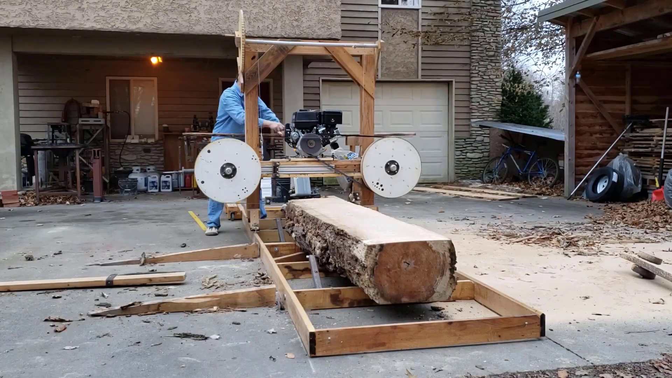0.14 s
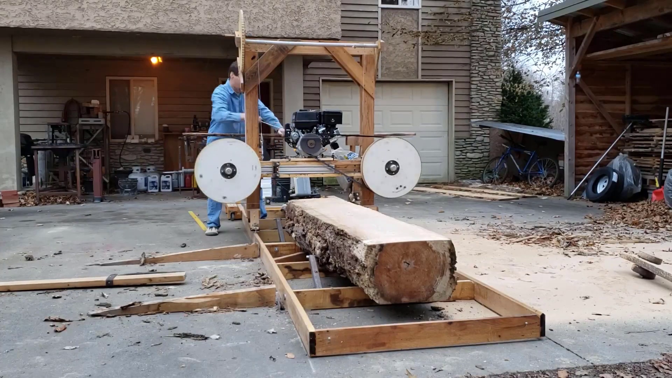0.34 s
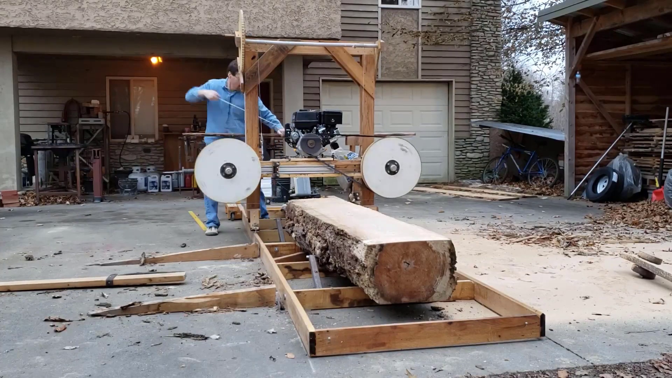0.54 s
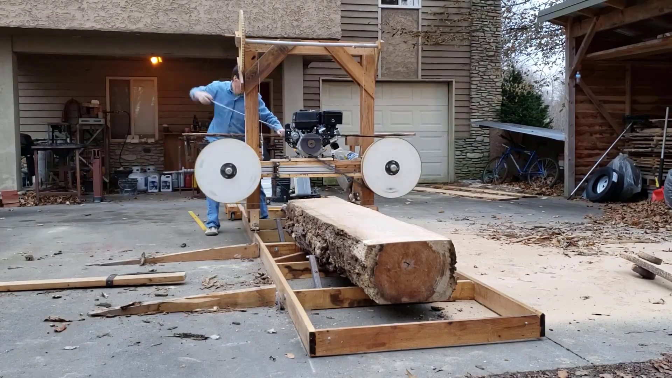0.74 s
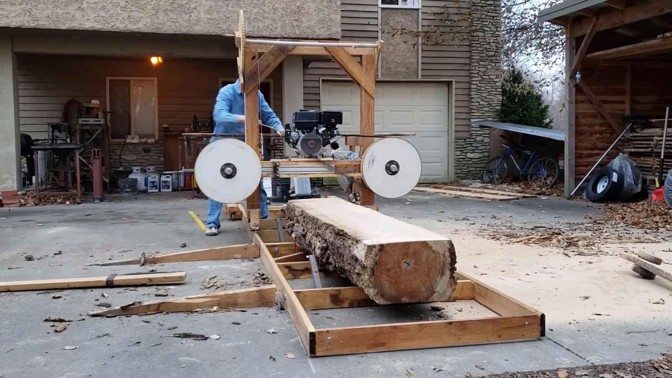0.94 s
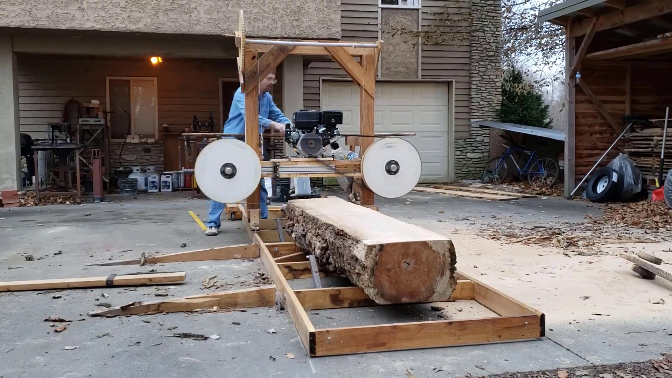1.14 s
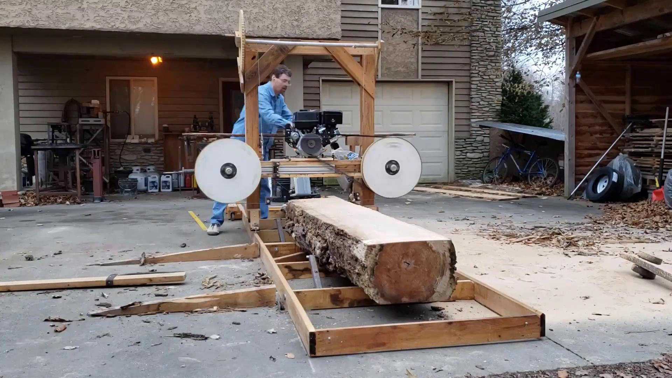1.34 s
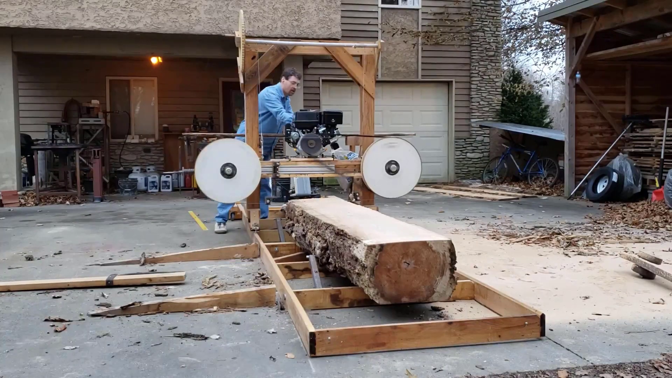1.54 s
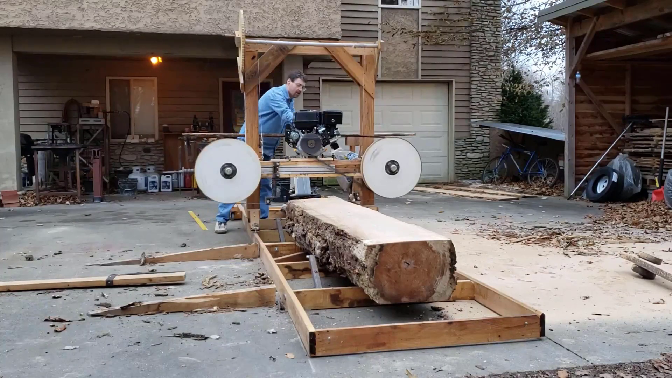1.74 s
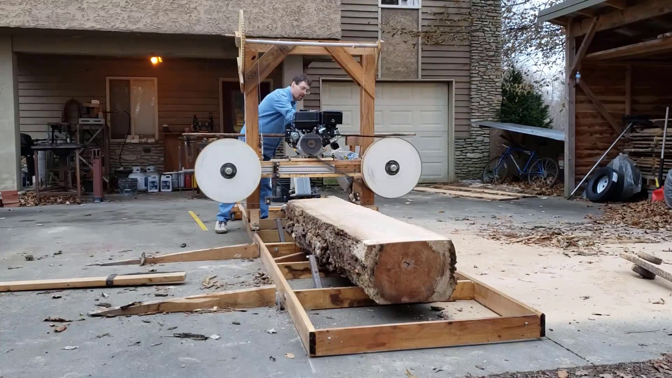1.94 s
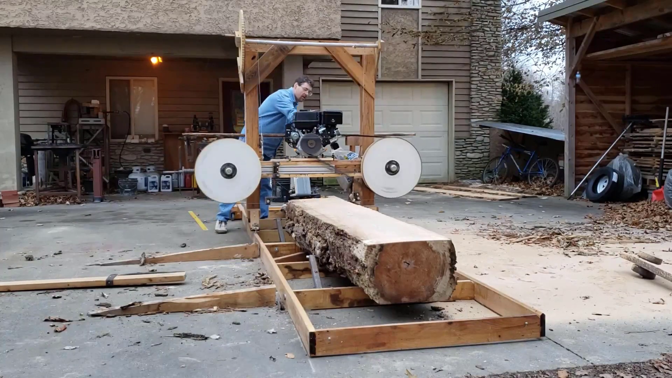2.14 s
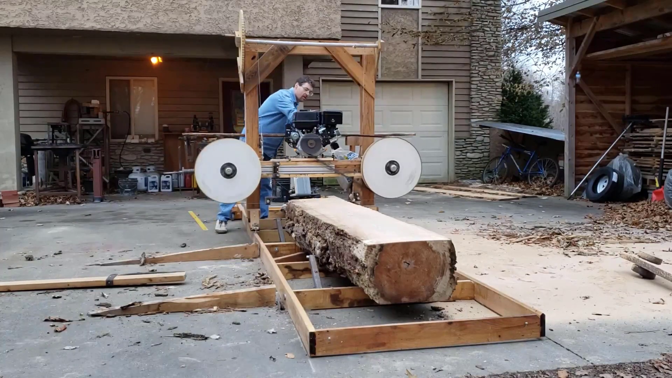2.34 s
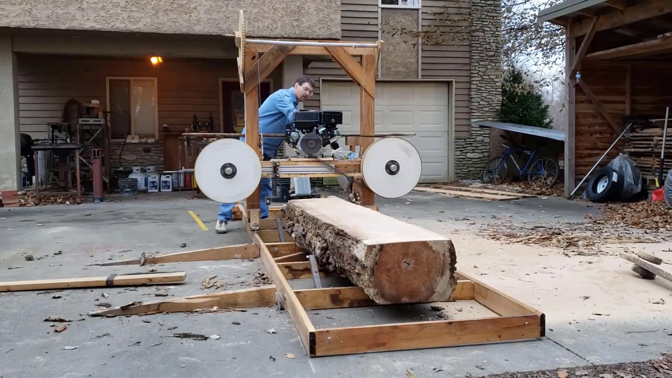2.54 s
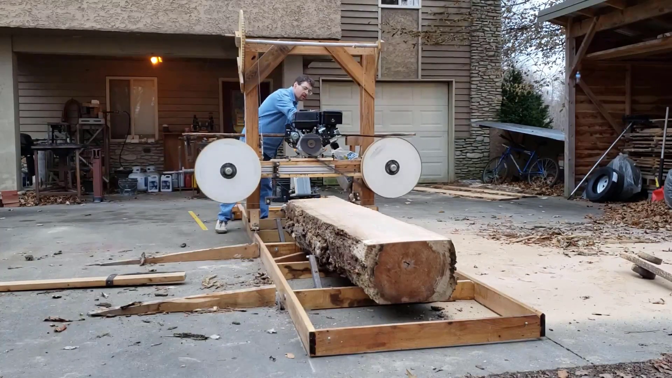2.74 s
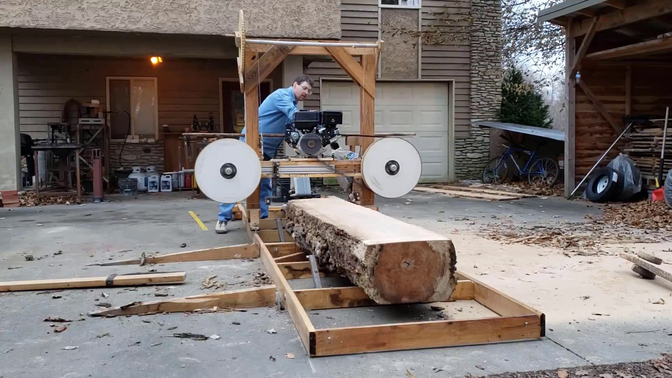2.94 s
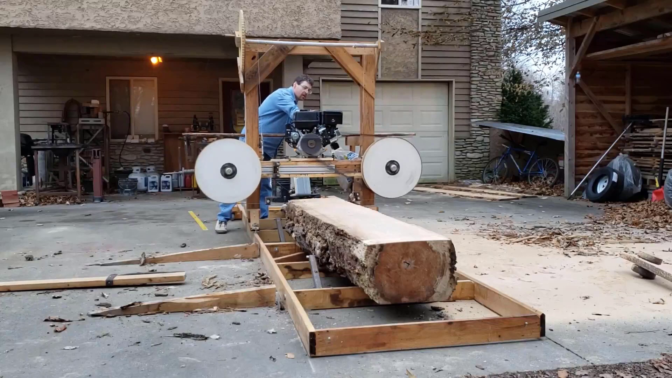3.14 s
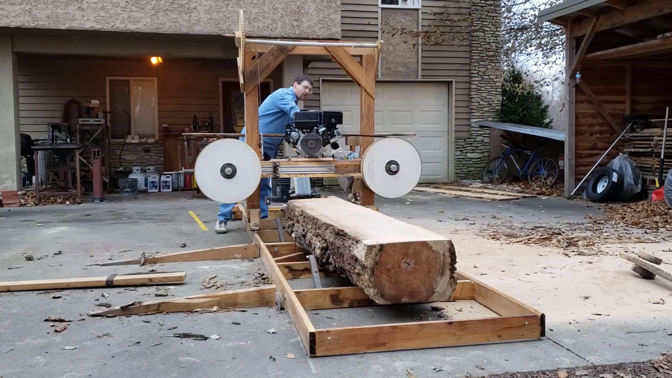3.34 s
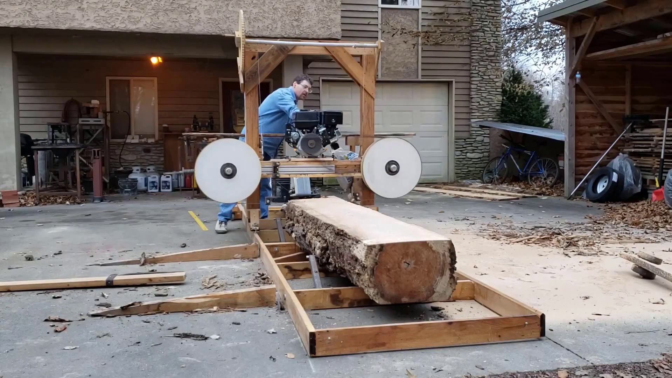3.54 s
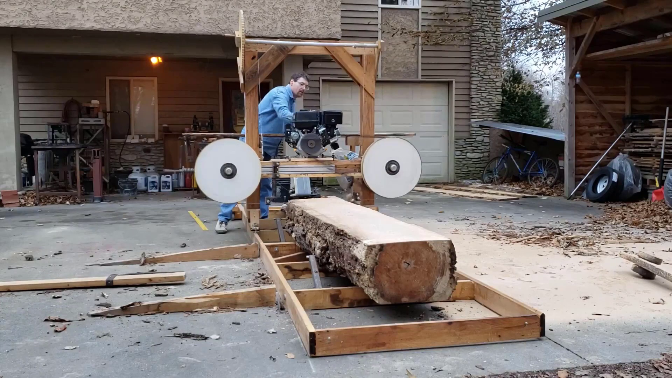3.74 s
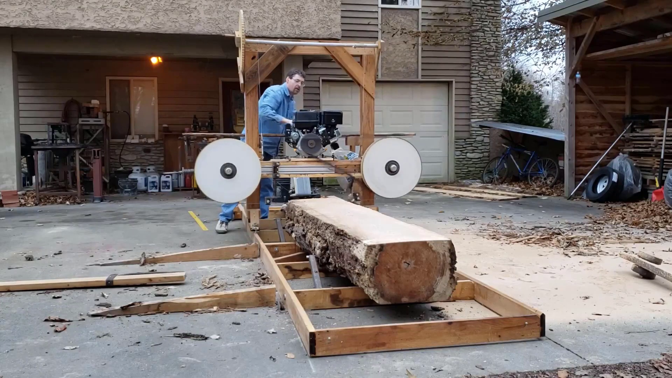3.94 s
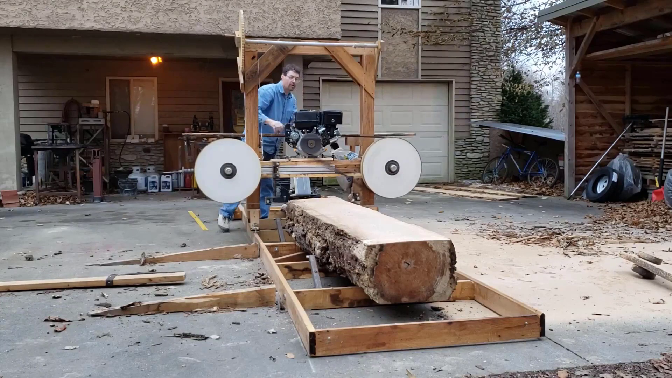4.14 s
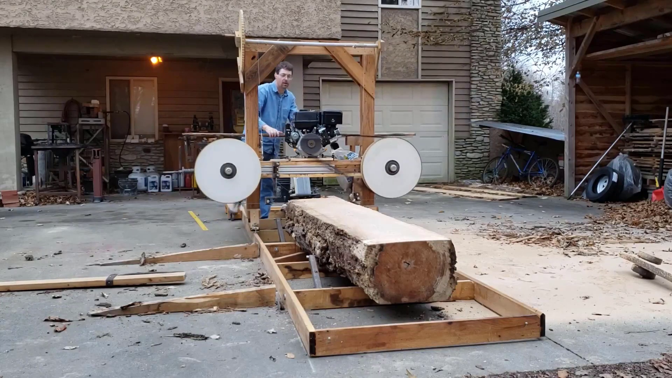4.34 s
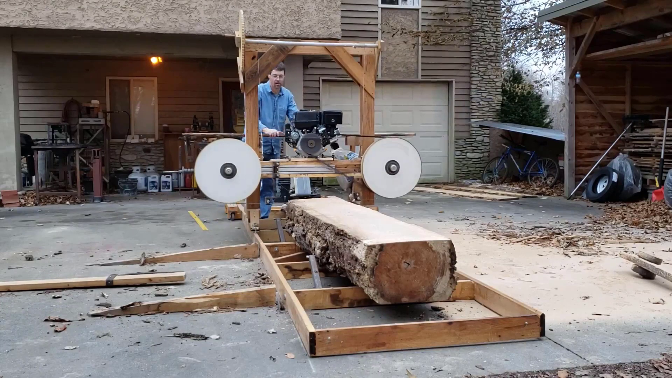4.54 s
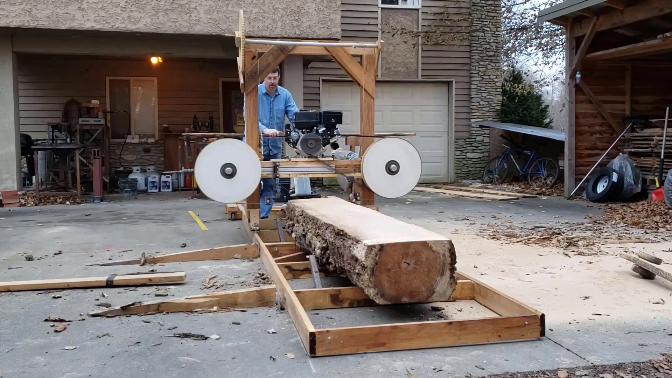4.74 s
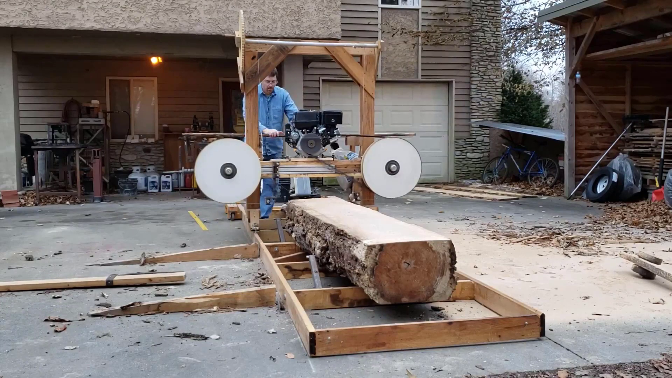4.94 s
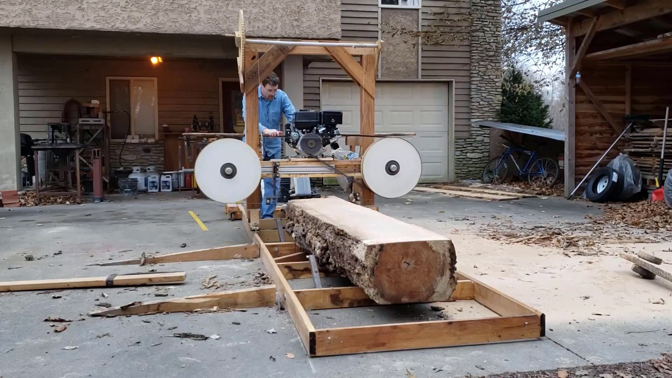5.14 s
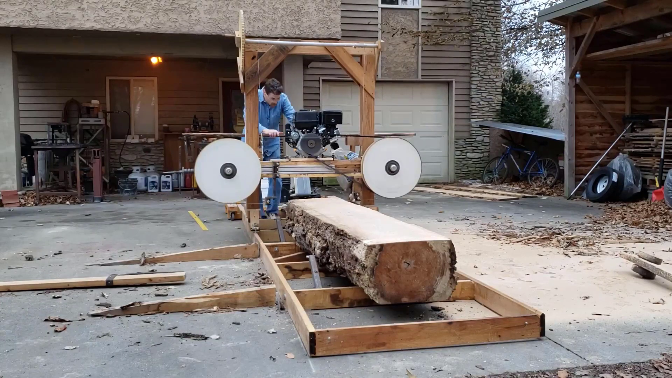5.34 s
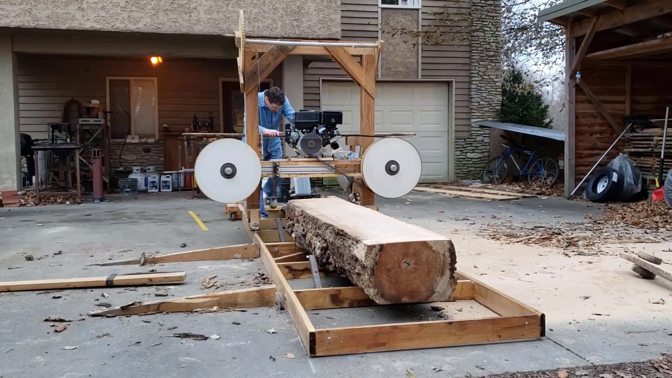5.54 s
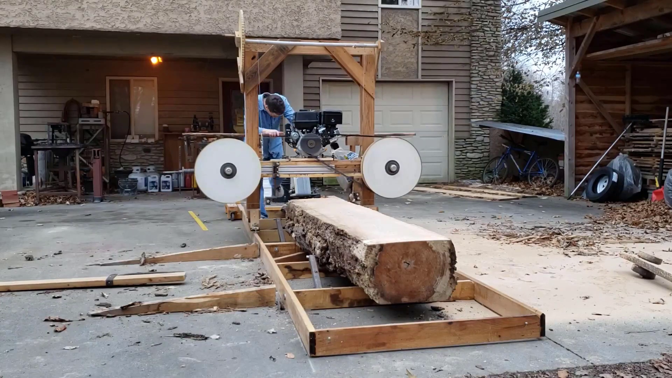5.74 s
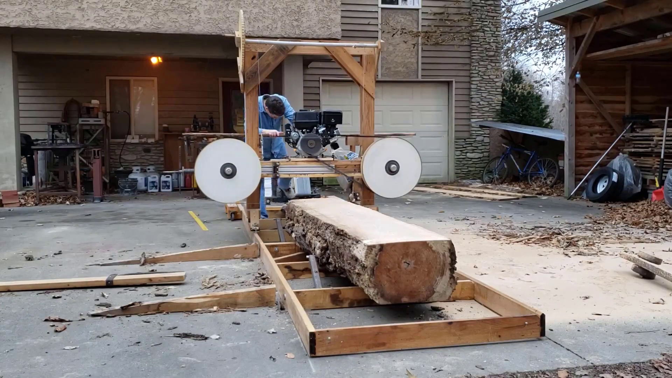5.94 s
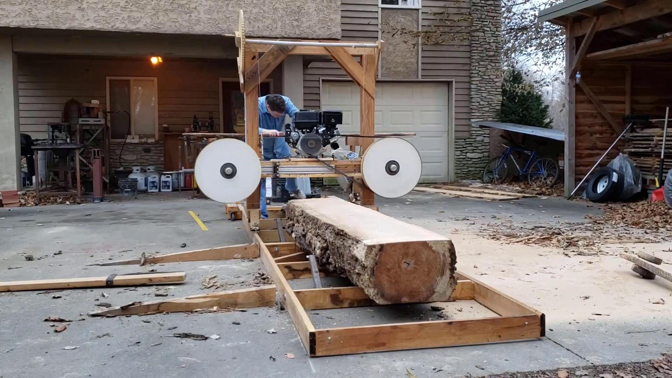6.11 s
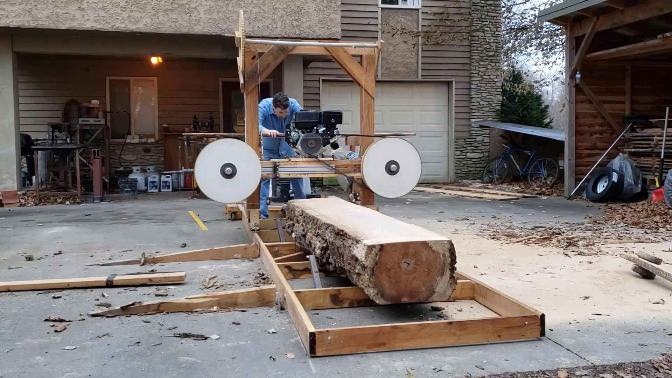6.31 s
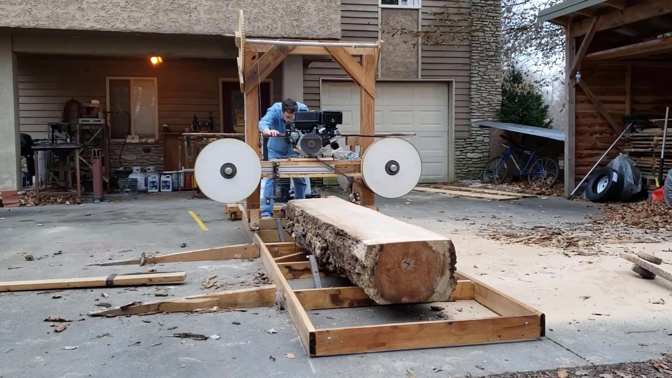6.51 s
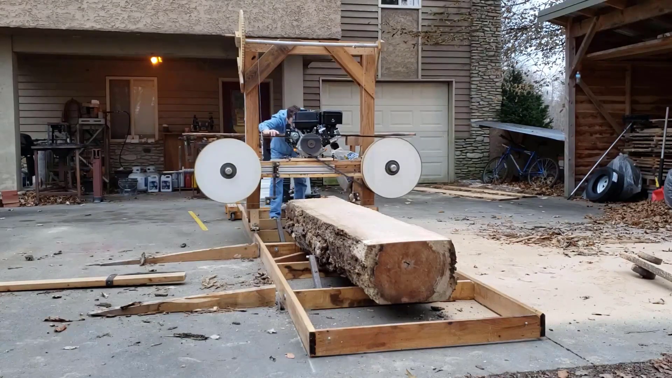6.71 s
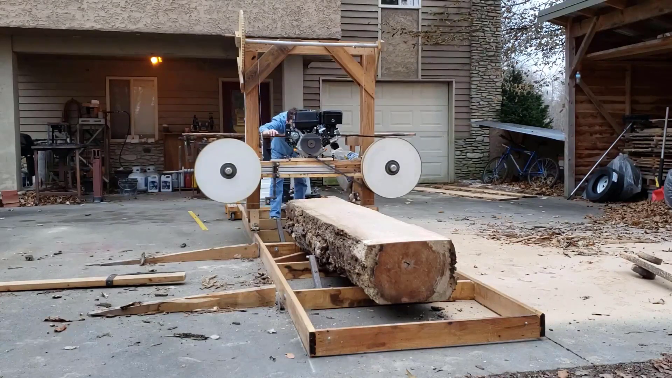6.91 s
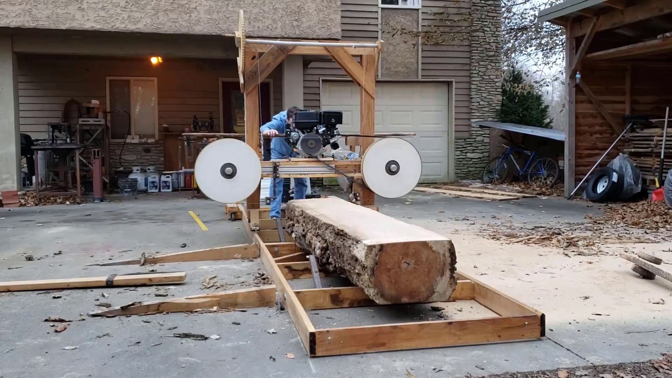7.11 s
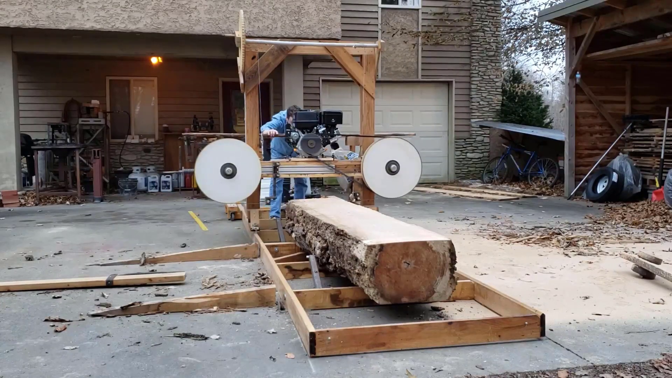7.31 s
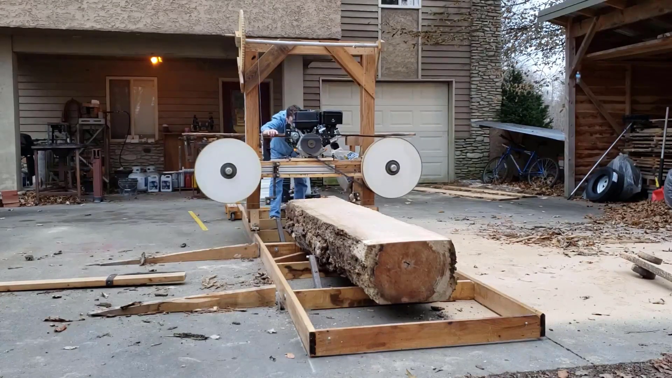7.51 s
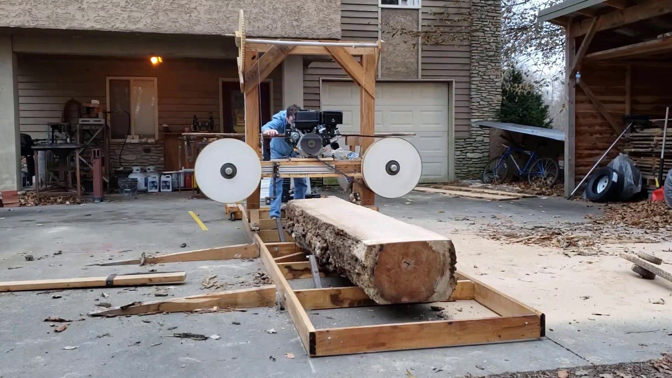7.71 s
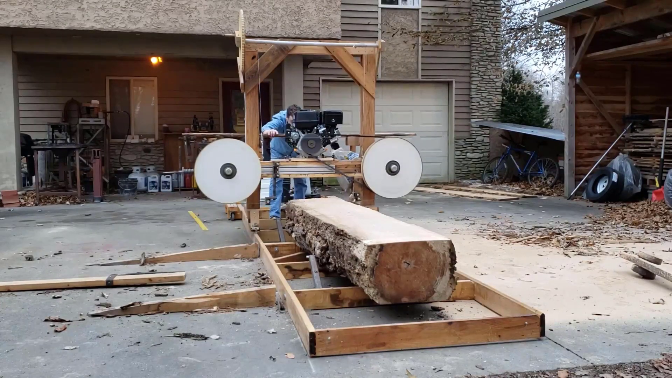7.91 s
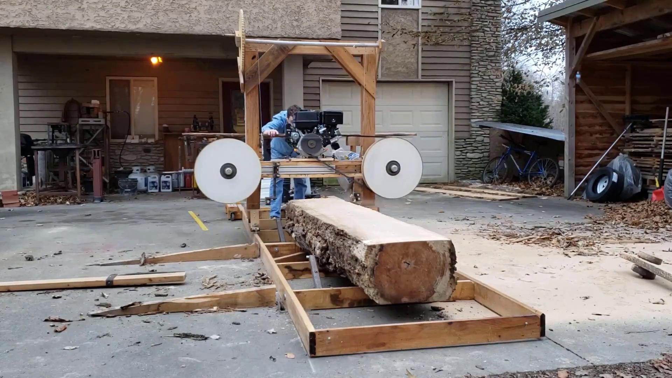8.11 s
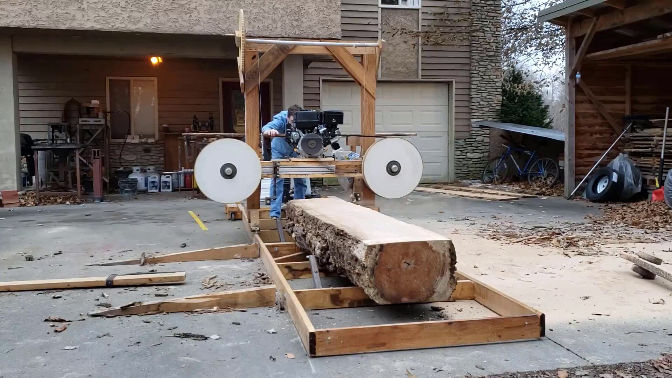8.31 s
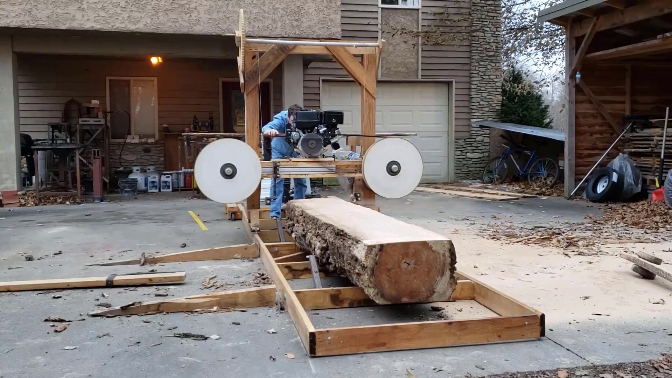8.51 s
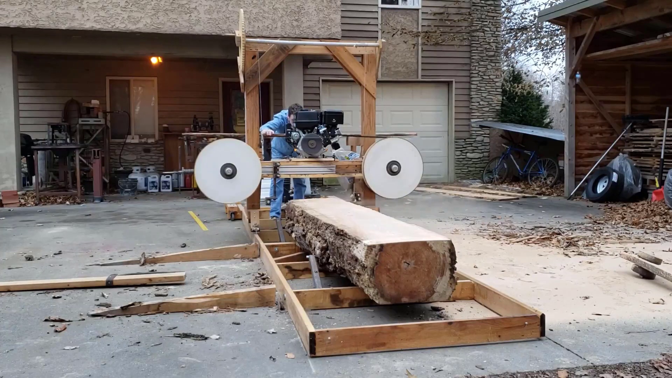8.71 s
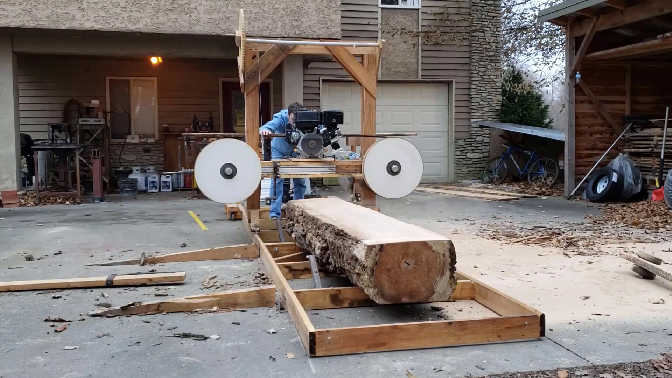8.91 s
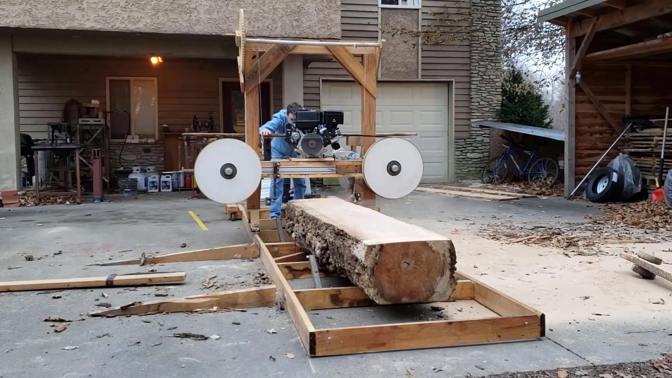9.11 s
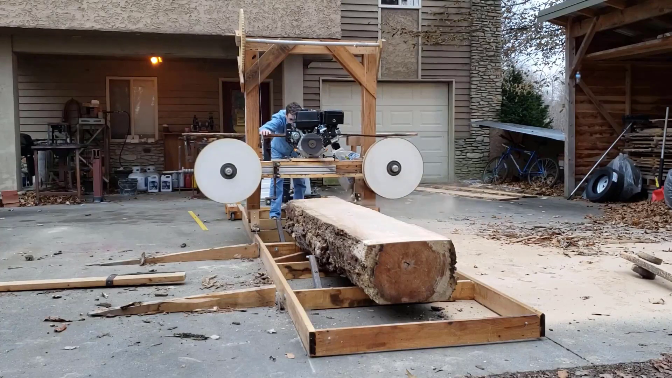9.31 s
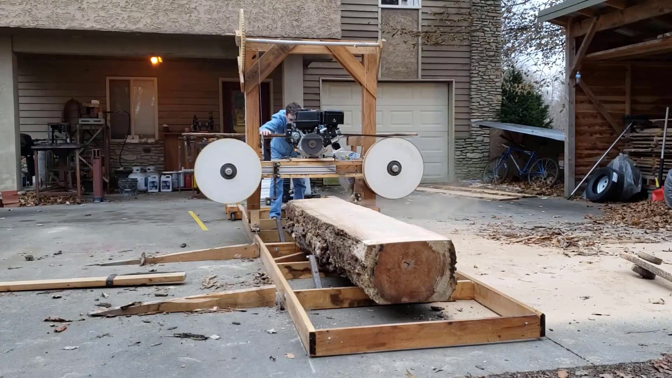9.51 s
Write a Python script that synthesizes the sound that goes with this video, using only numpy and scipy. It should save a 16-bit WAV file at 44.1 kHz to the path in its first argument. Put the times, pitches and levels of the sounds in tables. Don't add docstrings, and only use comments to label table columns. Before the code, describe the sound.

Quiet outdoor murmur and a faint hum, then small metallic ratchet ticks, one much louder, and a fast rising cord rattle. A small engine on a band sawmill catches raggedly and settles into rapid puttering with a short wall echo. A loud, nearly constant treble hiss covers it, with frame roar beneath. Two small metal taps occur midway; the beat later sags and softens. Heard from several metres.

```python
import sys
import numpy as np
from scipy import signal
from scipy.fft import rfft, irfft, next_fast_len
from scipy.io import wavfile
from scipy.ndimage import uniform_filter1d

SR = 44100
rng = np.random.default_rng(int(sys.argv[2]) if len(sys.argv) > 2 else 0)


def log_audio(samples):
    frames = np.atleast_2d(samples).T
    limited = np.clip(frames, -1, 1)
    pcm = np.round(limited * 32767).astype(np.int16)
    wavfile.write(sys.argv[1], SR, pcm)


def to_linear_factor(level_db):
    exponent = np.asarray(level_db, float) / 20
    return 10 ** exponent


N = 426006
T = np.arange(N) / SR

# f/Hz, likeness/0-1
LIKENESS = [(60, 0), (130, 0.69), (200, 1), (290, 0.66), (640, 0.28), (1400, 0.02), (3100, 0.09),
            (7000, 0.37), (15000, 0.37)]
# f/Hz, level/dB per Hz
YARD_COLOUR = [(150, -32), (250, -1), (600, -11), (800, -15), (1300, -18), (3000, -24), (6500, -27),
               (13000, -26), (15000, -33), (15800, -45)]
# f/Hz, level/dB per Hz
WIND_COLOUR = [(12, -53), (20, -7), (86, -8), (107, -8), (130, -9), (170, -22), (290, -120)]
# t/s, level/dB
GUSTS = [(0, -6), (.8, -13), (3.0, -12), (3.7, 5), (4.3, -4), (7.8, 4), (8.6, 7)]
# f/Hz, rms level/dB
MAINS_HUM = [(120, -67)]
# f/Hz, level/dB per Hz
BOOM_COLOUR = [(65, -45), (110, -41), (140, -1), (162, 2.5), (209, 5), (232, 3.5), (269, -6), (320, -47),
               (420, -26), (700, -120)]
# t/s, peak level/dB, housing knock over crack/dB
PAWL_TICKS = [
    (0.1824, -69, -10),
    (0.2004, -66, -26),
    (0.2184, -44.5, -15),
    (0.2418, -51, -22),
    (0.2598, -45, -24),
    (0.2883, -29.5, -10),
    (0.3114, -47, -19),
]
# f/Hz, level/dB per Hz
HISS_COLOUR = [(4000, -27), (6500, -14), (7950, -6.5), (8500, -2.5), (10200, -1.5), (12500, 0.5),
               (14300, 2), (15700, -2)]
# f/Hz, level/dB per Hz
KNOCK_COLOUR = [(500, -25), (900, -6), (1200, 9), (1900, -5), (3000, 1), (4000, -14), (5000, 2),
                (9000, -20)]
# t/s, hiss level/dB
EFFORT = [(.27, -84), (.34, -68), (.5, -47.5), (.67, -35.5), (.76, -35), (.79, -27), (.85, -28.5),
          (1.2, -27), (3.15, -27), (3.5, -25), (4.0, -26), (4.22, -28), (4.6, -26.5), (5.7, -28),
          (6.6, -27), (7.7, -28), (8.25, -26), (9.66, -26.5)]
# f/Hz, width/Hz, level/dB
BLADE_MODES = [(8420, 60, -8), (9020, 70, -5), (10700, 40, -4), (11240, 40, -3), (11570, 55, -3),
               (11810, 110, 0), (12450, 35, -5), (12920, 55, -2), (13180, 35, -3), (13300, 40, -2),
               (13530, 40, -3), (13770, 65, -2), (14100, 50, -5), (14400, 35, -3)]
# f/Hz, level/dB per Hz
WHIRR_COLOUR = [(1180, -5.5), (2000, -4.5), (4290, -2.5), (7500, -2), (9750, -53), (16500, -120)]
# f/Hz, level/dB per Hz
ROAR_COLOUR = [(160, -4), (270, 0.5), (375, -10), (442, -0.5), (480, -11.5), (598, -4.5), (1510, 0),
               (2400, -6), (3120, -12), (5280, -120)]
# f/Hz, width/Hz, level/dB
CASING_MODES = [(463, 38, 7), (913, 39, 4), (1136, 42, -2), (1430, 84, 3), (1805, 72, 1), (2100, 23, -7)]
# t/s, peak level/dB, f/Hz
FIRST_FIRINGS = [(0.8, -35, 206), (0.925, -41, 188), (1.022, -30, 224.5), (1.121, -36, 184),
                 (1.195, -31, 219), (1.24, -33, 218), (1.338, -38, 160), (1.438, -36, 211),
                 (1.475, -36, 164), (1.55, -45, 191), (1.707, -40, 180), (1.885, -40, 204),
                 (1.978, -47, 160), (2.039, -41, 178), (2.081, -42, 227), (2.165, -41, 193),
                 (2.303, -41, 196), (2.377, -44, 217), (2.415, -38, 178), (2.48, -44, 210),
                 (2.596, -36, 174), (2.633, -39, 189), (2.707, -36, 228), (2.804, -38, 184),
                 (3.031, -39, 200.5), (3.061, -42, 175), (3.129, -37, 186), (3.269, -37, 199),
                 (3.367, -31, 216), (3.433, -31, 196)]
# t/s, firing rate f/Hz
SPEED = [(3.45, 17.4), (3.6, 17.9), (3.73, 17.5), (3.98, 19.8), (4.24, 21.4), (4.4, 22.1), (5.0, 21.9),
         (5.6, 22.07), (7.15, 22.05), (7.91, 21.9), (8.19, 21.1), (8.4, 19.4), (8.64, 20.1), (8.78, 20.3),
         (9.0, 21.1), (9.13, 21.2), (9.33, 20.6), (9.66, 20.0)]
# f/Hz, level/dB
MUFFLER_COLOUR = [(100, -60), (132, -28), (146, -8), (154, -6), (175, -1), (183, 6), (192, 6), (199, -1),
                  (220, -2), (243, -8), (265, -22), (400, -60)]
# t/s, tilt/dB
THROTTLE = [(3.8, 2), (4.0, -5), (4.3, 1), (8.72, -1), (8.95, -18), (9.45, -16), (9.6, 6)]
# t/s, level/dB
EXHAUST = [(0, -63.5), (.36, -52), (.74, -52), (.79, -43.5), (.97, -50.5), (1.75, -49), (3.1, -49),
           (3.5, -44), (3.78, -39), (3.95, -42.5), (4.6, -45.5), (5.4, -43.5), (8.1, -41), (8.35, -46.5),
           (8.7, -42), (9.2, -52), (9.5, -48), (9.62, -46)]
# t/s, peak level/dB, f/Hz
LOOSE_TICKS = [
    (5.132, -57, 2700),
    (5.336, -43, 3400),
    (5.39, -35, 8500),
]


def level(x, db):
    return x * to_linear_factor(db) / np.sqrt(np.mean(x ** 2))


def curve(table):
    s, value = np.transpose(table)
    return np.interp(T, s, value)


def on_log(table, hz):
    f, v = np.transpose(table)
    return np.interp(np.log(hz + 1), np.log(f), v)


def band(x, hz, width):
    return signal.lfilter(*signal.iirpeak(hz, hz / width, SR), x)


def walk(rate):
    k = int(SR / rate)
    steps = np.repeat(rng.standard_normal(N // k + 1), k)
    return 1.31 * uniform_filter1d(uniform_filter1d(steps, k), k)[:N]


def noise(spectrum):
    size = next_fast_len(N)
    hz = np.fft.rfftfreq(size, 1 / SR)
    alike = np.clip(on_log(LIKENESS, hz), 0, 1)
    mid, side = rfft(rng.standard_normal((2, size))) * to_linear_factor(on_log(spectrum, hz))
    mid, side = mid * np.sqrt(1 + alike), side * np.sqrt(1 - alike)
    return level(irfft([mid + side, mid - side], size)[:, :N], 0)


def ringing(modes, flutter_db, rate):
    broad = noise([(100, 0), (200, 0)])
    out = 0
    for hz, width, db in modes:
        mode = band(band(broad, hz, 1.57 * width), hz, 1.57 * width)
        out = out + to_linear_factor(db + flutter_db * walk(rate)) / np.sqrt(width) * mode
    return level(out, 0)


def quiet_yard():
    return to_linear_factor(-68) * noise(YARD_COLOUR)


def wind():
    return noise(WIND_COLOUR) * to_linear_factor(-64 + curve(GUSTS) + walk(2.74))


def mains_hum():
    return sum(np.sqrt(2) * to_linear_factor(db) * np.sin(2 * np.pi * f * T) for f, db in MAINS_HUM)


def pawl(crack_s=0.0008, tail_s=0.018, tail_db=-15, knock_s=0.0016):
    crack, knock = np.zeros((2, N))
    t = T[:SR // 12]
    for s, db, knock_db in PAWL_TICKS:
        start = int(s * SR)
        crack[start:][:len(t)] += to_linear_factor(db) * (np.exp(-t / crack_s) + to_linear_factor(tail_db) * np.exp(-t / tail_s))
        knock[start:][:len(t)] += to_linear_factor(db + knock_db) * np.exp(-t / knock_s)
    return crack * noise(HISS_COLOUR) + knock * noise(KNOCK_COLOUR)


def cord(start_s=.28, rise_s=.22, end_s=.67, release_s=.24, first_tug_db=-65, speed_db=-51):
    holding = np.clip((end_s + release_s - T) / release_s, 0, 1)
    rise = np.clip((T - start_s) / rise_s, 0, 1)
    rattle = (T > start_s) * holding * to_linear_factor(first_tug_db + rise * (speed_db - first_tug_db))
    return rattle, holding * rise


def fins_and_blade(effort_db, shake_db):
    steel = to_linear_factor(-9.5) * ringing(BLADE_MODES, 3.5, 2.5)
    return level(noise(HISS_COLOUR) + steel, 0) * to_linear_factor(effort_db + shake_db + 0.47 * walk(150))


def belt(effort_db, shake_db, engaged):
    belt_db = effort_db - 14.5 + 3.5 * engaged
    return noise(WHIRR_COLOUR) * to_linear_factor(belt_db + 0.8 * shake_db + 0.88 * walk(60))


def frame_and_cowl(effort_db, shake_db, rattle):
    broad, cowl = noise(ROAR_COLOUR), ringing(CASING_MODES, 1.9, 8.3)
    driven = to_linear_factor(effort_db - 22) * (broad + to_linear_factor(-13) * cowl)
    pulled = rattle * (to_linear_factor(-4.5) * broad + to_linear_factor(-4) * cowl)
    return (driven + pulled) * to_linear_factor(shake_db + 1.1 * walk(20))


def machine(phase):
    effort_db = curve(EFFORT) + .35 * walk(6)
    shake_db = 0.38 * walk(25) + 0.22 * np.cos(4 * np.pi * phase)
    rattle, engaged = cord()
    hiss = fins_and_blade(effort_db, shake_db)
    whirr = belt(effort_db, shake_db, engaged)
    return hiss + whirr + frame_and_cowl(effort_db, shake_db, rattle)


def catching(peak_s=0.021, lead_s=0.0082, wall_s=0.0204, wall_db=-6):
    out, t = np.zeros(N), T[:SR // 8]
    swell = (t / peak_s * np.exp(1 - t / peak_s)) ** 2
    for s, db, hz in FIRST_FIRINGS:
        tone = np.sin(2 * np.pi * (hz * t + rng.random()))
        out[int((s - lead_s) * SR):][:len(t)] += to_linear_factor(db) * swell * tone
    return out + to_linear_factor(wall_db) * np.roll(out, int(wall_s * SR))


def firing_cycle(hz):
    return .3 + np.cumsum(hz * (1 + .002 * walk(10))) / SR


def muffler(pulses, size=2 ** 15):
    hz = np.fft.rfftfreq(size, 1 / SR)
    cepstrum = irfft(np.log(to_linear_factor(on_log(MUFFLER_COLOUR, hz - 1))), size)
    cepstrum[1:size // 2] *= 2
    cepstrum[size // 2 + 1:] = 0
    ring = irfft(np.exp(rfft(cepstrum)), size)[:size // 4]
    return signal.fftconvolve(pulses, ring)[:N]


def running(cycle, wall_s=.018, wall_db=-7.5):
    at = np.flatnonzero(np.diff(np.floor(cycle)))
    pulses = np.zeros(N)
    pulses[at] = to_linear_factor(rng.standard_normal(len(at)))
    rung = muffler(pulses + to_linear_factor(wall_db) * np.roll(pulses, int(wall_s * SR)))
    low = signal.sosfiltfilt(signal.butter(12, 175, fs=SR, output="sos"), rung)
    tilt_db = curve(THROTTLE)
    return level(to_linear_factor(-tilt_db / 2) * low + to_linear_factor(tilt_db / 2) * (rung - low), 0)


def exhaust(hz, cycle, governed_hz=22, settle_s=3.47, settle_length_s=.26):
    even = np.clip(.965 - .08 * (governed_hz - hz), 0, 1)
    settled = np.clip((T - settle_s) / settle_length_s, 0, 1)
    boom = noise(BOOM_COLOUR)
    steady = np.sqrt(even) * running(cycle) + np.sqrt(1 - even) * boom
    body = settled * steady + (1 - settled) * boom
    return to_linear_factor(curve(EXHAUST)) * body + to_linear_factor(-5.5) * catching()


def loose_ticks(ring_s=.006):
    out, t = np.zeros(N), T[:SR // 20]
    swell = t / ring_s * np.exp(1 - t / ring_s)
    for s, db, hz in LOOSE_TICKS:
        burst = band(rng.standard_normal(len(t)), hz, hz / 4)
        out[int(s * SR):][:len(t)] += level(burst, db) * swell
    return out


def scene():
    hz = curve(SPEED)
    cycle = firing_cycle(hz)
    background = quiet_yard() + wind() + mains_hum()
    engine = pawl() + machine(cycle % 1) + exhaust(hz, cycle)
    mix = background + engine + loose_ticks()
    return mix * to_linear_factor([[-.15], [.15]])


def low_pass(x):
    return signal.sosfilt(signal.butter(12, 17000, fs=SR, output="sos"), x)


def record(dry, top_hz=15675, edge_hz=90):
    size = next_fast_len(N + SR // 10)
    cut = np.clip((top_hz - np.fft.rfftfreq(size, 1 / SR)) / edge_hz + .5, 0, 1)
    mix = irfft(rfft(dry, size) * np.sin(cut * np.pi / 2) ** 2, size)[:, :N]
    return low_pass(mix)


dry = scene()
out = record(dry)
log_audio(out)
```